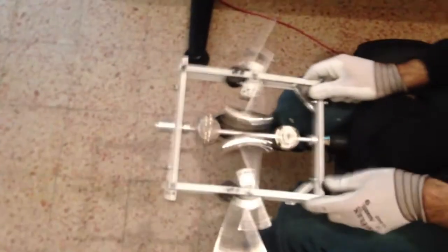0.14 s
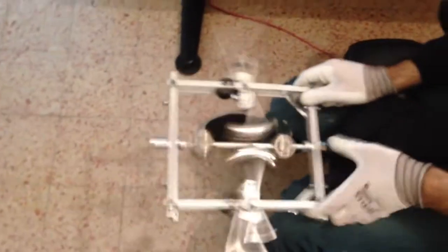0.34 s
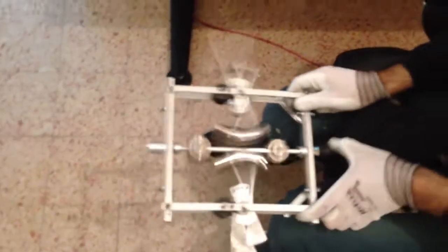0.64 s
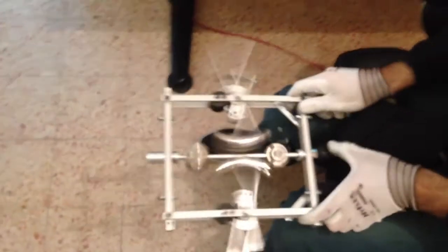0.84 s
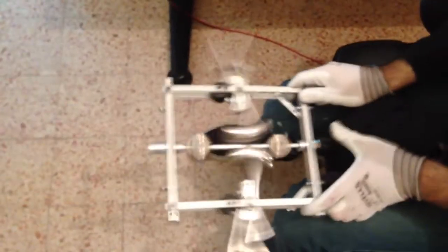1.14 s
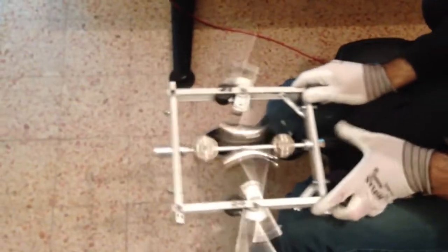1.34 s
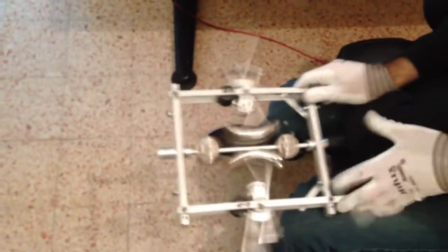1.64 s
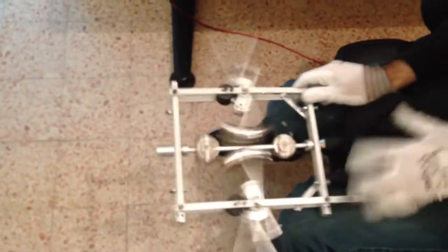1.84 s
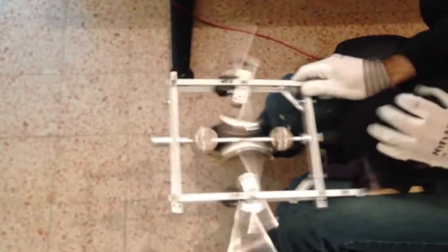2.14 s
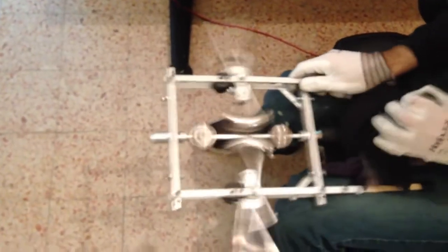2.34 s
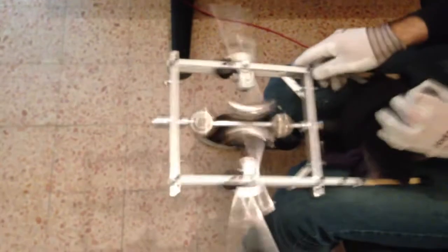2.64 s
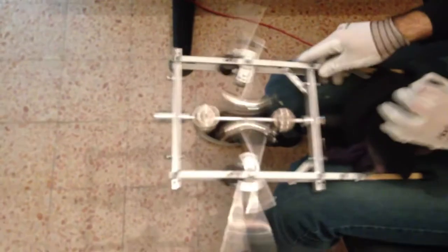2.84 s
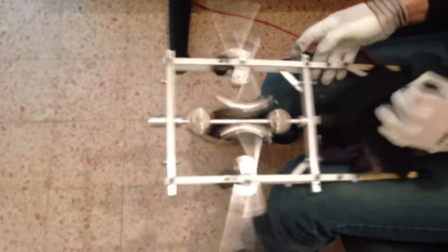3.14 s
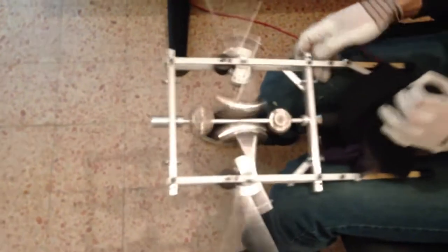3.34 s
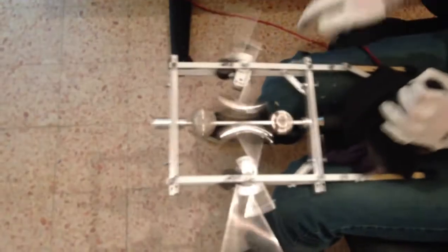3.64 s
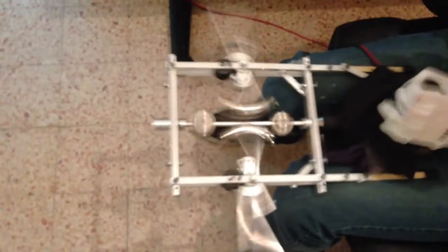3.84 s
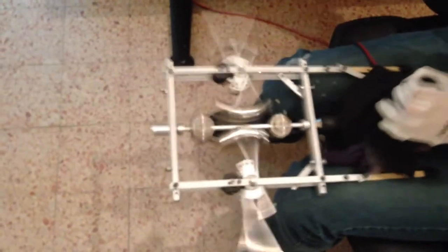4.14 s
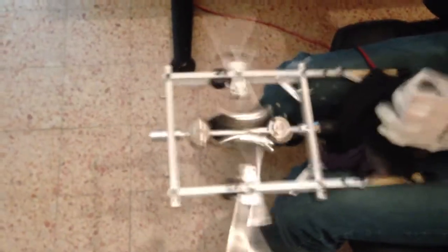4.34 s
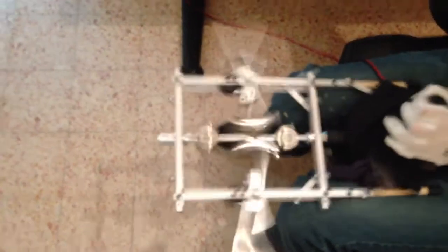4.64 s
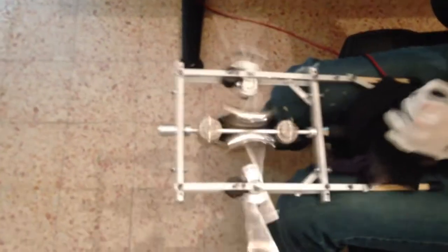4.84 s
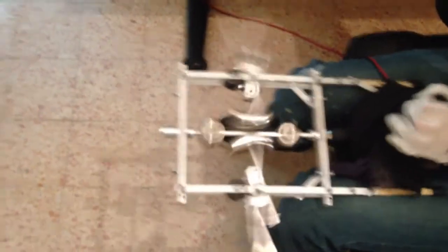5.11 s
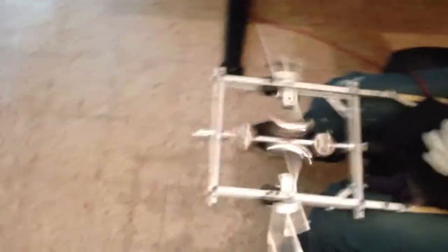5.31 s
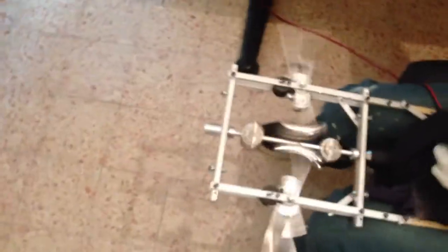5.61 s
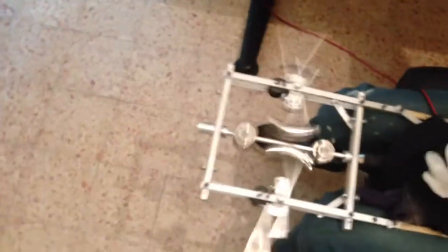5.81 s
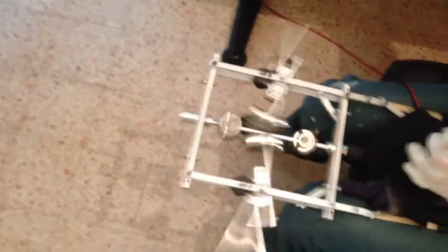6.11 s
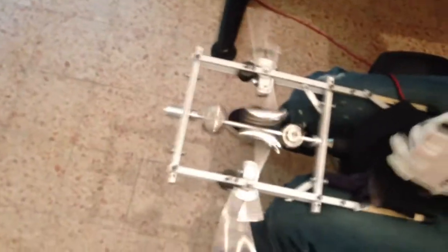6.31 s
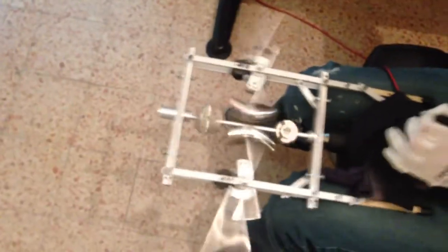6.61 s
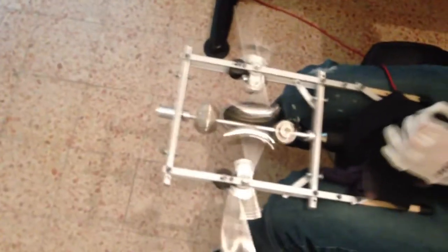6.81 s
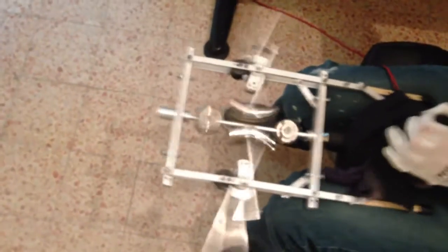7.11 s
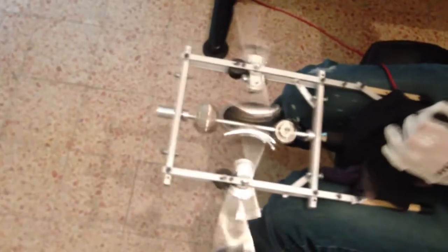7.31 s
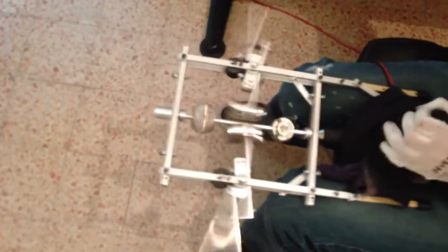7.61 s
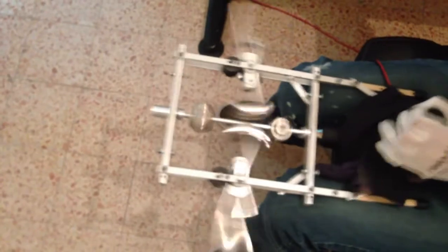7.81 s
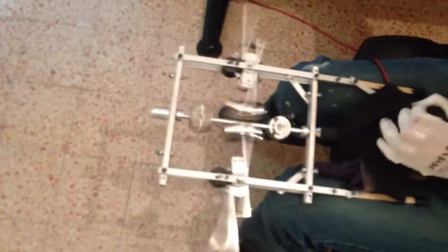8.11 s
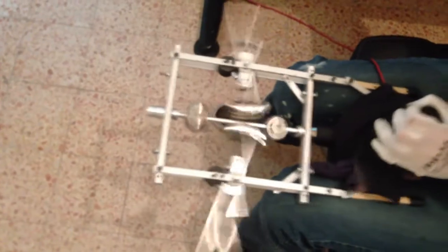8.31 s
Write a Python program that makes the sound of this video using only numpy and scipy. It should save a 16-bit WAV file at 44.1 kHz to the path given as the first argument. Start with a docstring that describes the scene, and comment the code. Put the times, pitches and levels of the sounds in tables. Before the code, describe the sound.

A motor-driven flapping mechanism clatters and whirs rapidly in a room, easing a little as its plastic wings start scraping the metal frame.

```python
"""A motor-driven pair of plastic wings flaps in a hand-held metal frame, in a hard-floored room.
At each turning point the loose linkage strikes, and the impacts excite the modes of its metal links.
Joints chatter, the film crinkles, and the gears whir, their pitch modulated by the load of each stroke.
One hand lets go and the frame shakes freely. The drive slows from about 15 to 12 beats a second,
and a wing then clashes with the frame on roughly every other beat."""
import sys
import numpy as np
from scipy import signal
from scipy.fft import rfft, irfft
from scipy.io import wavfile

SR = 44100
rng = np.random.default_rng(int(sys.argv[2]) if len(sys.argv) > 2 else 0)


def digitize_waveform(pressure):
    """Quantize a signal to 16-bit integers and store it at the path in sys.argv[1].

    Rows of a 2-D input are taken as channels; values are limited to [-1, 1].
    """
    field = np.atleast_2d(pressure).T
    bounded = np.clip(field, -1, 1)
    quanta = np.round(bounded * 32767).astype(np.int16)
    wavfile.write(sys.argv[1], SR, quanta)


N = 373086
TIME = np.arange(N) / SR

# speed of the crank: time_s, beat_rate_hz
CRANK_SPEED = [(0.0, 15.594), (0.97, 15.462), (1.37, 15.64), (2.1, 15.606), (2.67, 14.926), (2.81, 15.249),
               (3.55, 15.686), (4.05, 15.313), (4.67, 15.233), (5.03, 13.71), (5.57, 13.55), (6.2, 12.511),
               (6.6, 12.225), (7.63, 11.894), (8.46, 11.802)]
# how hard the whole frame rattles: time_s, gain_db
FRAME_SHAKING = [(0, 1), (.5, 0), (.85, -1.5), (1.3, -1), (2.1, .5), (3.9, 0), (4.25, 1), (4.38, 1),
                 (4.62, 2), (4.87, -0.5), (5.08, 0), (5.35, 0), (5.75, 0), (7.3, -1), (7.8, -5),
                 (8.18, 0.5), (8.46, -6.5)]
# spectra of the linkage's snap, knock and return and of the wing film: frequency_hz, gain_db
SNAP_SPECTRUM = [(100, -36), (600, -52), (1300, -27), (2600, 6.5), (4200, 6), (5200, 11.5), (6500, 7.5),
                 (9000, 6.5), (13500, 1.5), (15000, 0.5)]
KNOCK_SPECTRUM = [(100, -63), (650, 2), (1100, 1), (2300, 3), (3100, 4.5), (4200, 8.5), (5300, 9),
                  (7800, 6.5), (10000, -22), (14000, -24), (15000, -1)]
RETURN_SPECTRUM = [(100, -30), (600, -4), (1000, -8), (2400, 6), (3500, 0), (5100, 4), (5900, 0), (7000, 3),
                   (8500, -10), (13500, -16), (15000, -9)]
FILM_SPECTRUM = [(1000, -9), (3000, -29.5), (5000, 5), (7500, -8.5), (10000, -4.5), (13500, -11.5),
                 (15000, -9)]


def amp(db):
    """Decibels to amplitude ratio."""
    return 10 ** (np.asarray(db) / 20)


def unit_rms(x):
    """Normalisation to unit mean power."""
    return x / np.sqrt(np.mean(x ** 2) + 1e-20)


def curve(rows, time_s=TIME):
    """Linear interpolation in time of each column after the first."""
    times, *columns = np.transpose(rows)
    return [np.interp(time_s, times, column) for column in columns]


def at_frequency(points, hz):
    """Interpolation on a logarithmic frequency axis."""
    frequencies, values = np.transpose(points)
    return np.interp(np.log(hz + 1), np.log(frequencies + 1), values)


def add(mix, start_s, sound):
    """Superposition of a sound on the mix."""
    part = mix[max(round(start_s * SR), 0):][:len(sound)]
    part += sound[:len(part)]


def colour(x, spectrum, size=4096):
    """Minimum-phase filter of unit energy with the given spectrum."""
    log_gain = np.log(amp(at_frequency(spectrum, abs(np.fft.fftfreq(size, 1 / SR)))))
    response = np.fft.ifft(np.exp(signal.hilbert(log_gain).conj())).real[:size // 2]
    return signal.oaconvolve(x, response / np.linalg.norm(response))[:N]


def drift(rate_hz):
    """Slow random fluctuation: low-passed noise of unit rms."""
    rolloff = 1 + (np.fft.rfftfreq(N, 1 / SR) / rate_hz) ** 4
    return unit_rms(irfft(rfft(rng.standard_normal(N)) / rolloff, N))


def grains(per_s, spread_db):
    """Shot noise: sparse impulses of uneven size and random sign."""
    size = amp(spread_db * np.minimum(rng.exponential(1, N), 3))
    return unit_rms(size * rng.choice([-1, 1], N) * (rng.random(N) < per_s / SR))


def slowness(time_s=TIME):
    """Loss of crank speed: 0 at the fastest, 1 at the slowest."""
    rates = np.transpose(CRANK_SPEED)[1]
    return (rates.max() - curve(CRANK_SPEED, time_s)[0]) / np.ptp(rates)


def looseness(time_s=TIME, let_go_s=2.2, loosening_s=.49):
    """Freedom of the frame: 0 held in both hands, 1 once it shakes freely."""
    return np.clip((time_s - let_go_s) / loosening_s, 0, 1)


def room(x):
    """Reverberation: sparse reflections of random sign decay exponentially, each band at its own rate."""
    # reverberation time: frequency_hz, t60_s
    decay_times = [(150, 0.21), (600, 0.55), (2000, 0.45), (5000, 0.2), (10000, 0.32), (15000, 0.2)]
    build_up = 1 - np.exp(-TIME[:SR] / .004)
    reflections = rng.choice([-1., 1.], SR) * (rng.random(SR) < 4000 / SR) * build_up
    hz, t, bands = signal.stft(reflections, SR, nperseg=256)
    decay = amp(-60 * t / at_frequency(decay_times, hz)[:, None])
    tail = signal.istft(bands * decay, SR, nperseg=256)[1]
    return signal.fftconvolve(x, tail / np.linalg.norm(tail))[:N]


def shifting_room(x, rate_hz, count=4):
    """Directivity: moving parts radiate in changing directions, so sets of reflections take turns."""
    aim = np.array([drift(rate_hz) for _ in range(count)])
    return sum(room(x * share) for share in aim / np.linalg.norm(aim, axis=0))


def handling_thumps():
    """Structure-borne sound: moving the microphone gives soft, low tone pulses."""
    # thumps: start_s, pitch_hz, level_db, length_s
    thumps = [(5.12, 190, -38, .075), (5.205, 250, -40, .075)]
    out = np.zeros(N)
    for start_s, hz, db, length_s in thumps:
        t = np.arange(round(length_s * SR)) / SR
        envelope = np.sin(np.pi * t / length_s) ** 2
        add(out, start_s, amp(db) * np.sqrt(2) * np.sin(2 * np.pi * hz * t) * envelope)
    return out


def stirred_air(turns, peak_cycles=.38, depth_db=4):
    """Amplitude-modulated flow noise: the wings push the air twice a beat."""
    # spectrum of the moving air: frequency_hz, gain_db
    air_spectrum = [(20, -1), (50, 12), (85, -29), (110, -35), (150, 1.5), (200, 0.5), (260, 6), (360, 1),
                    (430, 5), (560, 7.5), (900, -2), (1500, -5), (4000, -61)]
    swell = unit_rms(amp(depth_db * np.cos(2 * np.pi * (2 * turns - peak_cycles))))
    return amp(-41.5) * unit_rms(colour(rng.standard_normal(N), air_spectrum)) * swell


def frame_drone(slow_change_db=4.5):
    """Resonance under random forcing: each low mode of the frame gives a narrow band of noise."""
    # modes of the frame: pitch_hz, width_hz, level_db
    frame_modes = [(206.8, 43, -56.5), (254.7, 30, -54.5), (313.2, 37, -57.5)]
    out = np.zeros(N)
    for hz, width_hz, db in frame_modes:
        envelope = drift(width_hz / 2) + 1j * drift(width_hz / 2)
        out += amp(db) * (np.exp(2j * np.pi * hz * TIME) * envelope).real
    return amp(slow_change_db * slowness()) * out


def rotor_hum(turns, rotor_turns_per_beat=8):
    """Periodic rotation: a wavering hum at the rotor's rate and at its second harmonic."""
    # strength of the hum: time_s, fundamental_db, octave_db
    hum_levels = [(0, -55, -57), (.5, -60, -56), (.75, -63, -49.5), (1.3, -67, -51), (1.55, -58, -66),
                  (2.8, -59, -60), (3.3, -77, -63), (4.2, -68, -50.5), (5.2, -73, -74)]
    angle = rotor_turns_per_beat * (2 * np.pi * turns + .025 * drift(rate_hz=3))
    fundamental_db, octave_db = curve(hum_levels)
    return np.sqrt(2) * (amp(fundamental_db) * np.sin(angle) + amp(octave_db) * np.sin(2 * angle))


def gear_tones(turns, slow_change_db=-2):
    """Line spectrum of the gear train: thin tones follow the crank, wavering as the frame moves."""
    # gear tones: multiple_of_beat_rate, level_db, loose_change_db
    lines = [(32, -51, -9), (33, -49.5, -5), (34.4, -57, 6), (40.1, -52, -3), (42.35, -47, -5),
             (44.3, -44.5, -4), (48.3, -46.5, -4)]
    tones = np.zeros(N)
    for multiple, db, loose_change_db in lines:
        gain = amp(db + loose_change_db * looseness() + 1.5 * drift(rate_hz=2))
        tones += gain * np.sin(2 * np.pi * multiple * turns + .6 * drift(rate_hz=5))
    return np.sqrt(2) * amp(slow_change_db * slowness()) * tones


def gear_whir(turns, load_peak_turns=.85):
    """Frequency modulation: the motor sags under each stroke, splitting the mesh tone into sidebands."""
    # partials of the tooth rate: harmonic_number, level_db
    harmonics = [(1, -40.5), (2, -52.5), (3, -53), (4, -46.5)]
    slow = slowness()
    mean_hz = 632 - 52 * slow
    load_angle = 2 * np.pi * (turns - load_peak_turns)
    load = np.cos(load_angle) + .1 * np.cos(3 * load_angle)
    waver = .012 * drift(rate_hz=25)
    sag = (.16 - .095 * slow) * load * (1 + .15 * drift(rate_hz=10))
    teeth = np.cumsum(mean_hz * (1 - sag + waver)) / SR
    whir = sum(amp(db) * np.sqrt(2) * np.sin(2 * np.pi * k * teeth) for k, db in harmonics)
    gain_db = -1.5 - 4.5 * slow - 4 * (1 - looseness()) - 2 * load  # quieter when slow, held or loaded
    roughness = 1 + .71 * drift(rate_hz=60)
    return amp(gain_db) * whir * roughness


def ring(x, modes):
    """Modal response: the excitation is convolved with a sum of damped sinusoids."""
    t = TIME[:SR // 8]
    response = sum(amp(db) * unit_rms(amp(-60 * t / t60_s) * np.sin(2 * np.pi * hz * t))
                   for hz, db, t60_s in modes)
    return signal.oaconvolve(x, response / np.sqrt(len(t)))[:N]


def links(x, detuning=.04, count=5):
    """Variable resonance: the metal links ring a little higher or lower as their joints shift."""
    # modes of the links: pitch_hz, level_db, t60_s
    link_modes = [(2220, -13, .018), (2420, -10, .022), (2560, -8, .028), (2720, -12, .02)]
    weights = np.array([drift(rate_hz=20) ** 3 for _ in range(count)])
    tunings = 1 + detuning * np.linspace(-1, 1, count)
    return sum(ring(x * share, [(hz * tuning, db, t60_s) for hz, db, t60_s in link_modes])
               for tuning, share in zip(tunings, weights / np.linalg.norm(weights, axis=0)))


def settling(turns, rise_turns, fall_db):
    """Envelope of damped motion: shaken up by snap and knock, dying away through the beat."""
    place = turns % 1
    floor = amp(-fall_db)
    shaken = floor + (1 - floor) * np.tanh((place / rise_turns) ** 2)
    return unit_rms(shaken * amp(-fall_db * place ** 2))


def rattle(turns):
    """Filtered shot noise: joints chatter and the film crinkles, most just after the wing turns over."""
    # spectra of the joints' chatter and of the quickly dying buzz: frequency_hz, gain_db
    joint_spectrum = [(150, -44), (400, 1.5), (900, -1), (1230, -3), (1450, 3.5), (1750, 5), (2100, -0.5),
                      (2500, 3.5), (3000, 2), (3700, 5.5), (4550, 3), (5200, 2), (7000, -1.5),
                      (11000, -15.5)]
    buzz_spectrum = [(1500, -33.5), (2000, 3), (2450, 0.5), (2900, -10), (3400, -15.5), (4000, -3.5),
                     (4700, -21), (8000, -3.5), (12000, -25.5)]
    # strength of buzz and clinks together: time_s, gain_db
    upper_levels = [(0, -34), (.6, -34.5), (2.1, -32.5), (4.1, -36.5), (5.1, -42), (6.3, -38.5), (6.9, -36),
                    (8.46, -40)]
    joints = amp(-30.5) * colour(grains(per_s=2500, spread_db=2.5), joint_spectrum)
    joints *= settling(turns, rise_turns=.094, fall_db=8.5)
    clinks = amp(-6.5) * links(grains(per_s=250, spread_db=2))
    buzz = amp(-3.5) * colour(grains(per_s=900, spread_db=1.5), buzz_spectrum)
    upper = amp(curve(upper_levels)[0]) * (buzz + clinks) * settling(turns, rise_turns=.14, fall_db=36)
    film = amp(-36.5 - 8.5 * np.sqrt(slowness())) * colour(grains(per_s=1000, spread_db=2), FILM_SPECTRUM)
    film *= settling(turns, rise_turns=.1, fall_db=16)
    return amp(curve(FRAME_SHAKING)[0]) * (joints + upper + film)


def strike(contacts, spectrum, scuff_s):
    """Impact excitation: each hard contact is a very short, filtered burst of noise."""
    t, out = TIME[:SR // 100], np.zeros(N)
    for start_s, db in contacts:
        hit = colour(rng.choice([-1, 1], len(t)) * np.exp(-t / scuff_s), spectrum)
        add(out, start_s, amp(db) * hit / np.linalg.norm(hit))
    return out


def pings(tick_db=-3):
    """Free vibration: a loose pin or link, struck once, ticks and rings in a single mode."""
    # struck pins and links, mostly just after the hand lets go: start_s, pitch_hz, level_db, t60_s
    pins = [(1.719, 4080, -9, .04), (2.417, 3440, -2, .035), (2.482, 3500, -3, .035),
            (2.548, 3520, -2, .03), (2.615, 3450, 0, 0.036), (2.748, 3440, -5, .03), (2.879, 3500, -8, .03),
            (2.944, 3420, -1, 0.02), (3.008, 3440, -5, .03), (3.016, 5500, -4, .04),
            (3.14, 3490, -5, 0.038), (3.173, 2400, -7, 0.032), (3.269, 3405, -6, .025),
            (3.398, 3440, -5, 0.016), (3.494, 4110, -1, 0.064), (3.797, 2550, -2, 0.037),
            (3.948, 3690, -5, 0.048), (4.01, 2560, -3, .035)]
    t, out = TIME[:SR // 8], np.zeros(N)
    for start_s, hz, db, t60_s in pins:
        tone = amp(-60 * t / t60_s) * np.sin(2 * np.pi * hz * t)
        add(out, start_s, amp(db) * tone / np.linalg.norm(tone))
    ticks = [(start_s, db + tick_db) for start_s, _, db, _ in pins]
    return out + strike(ticks, RETURN_SPECTRUM, scuff_s=.00039)


def hard_contacts():
    """Isolated transients: single impacts stand out of the rattle."""
    # unusually hard snaps and knocks, and clacks of a wing's edge on the frame: start_s, level_db
    snaps = [(.5525, -1), (2.6815, -1), (3.3325, -2), (3.718, -6), (3.783, -13), (3.847, -5), (3.9107, 0.5),
             (4.1085, -3), (4.369, -0.5), (4.434, -1)]
    knocks = [(.5598, -6), (.625, 3.5), (.6893, -2), (.8192, -2), (2.581, -1), (2.6485, -1), (2.7152, -4),
              (2.8483, -13), (3.173, -4), (3.2388, -1), (3.4943, -5), (3.5585, -2), (4.4657, 0),
              (4.5978, 2), (4.7085, 1), (4.7967, 1), (4.8425, 0), (4.866, -10), (4.9354, 2)]
    clacks = [(5.341, -16), (5.7447, -6), (6.0268, -0.5), (6.9885, -2), (7.001, -1), (7.153, -2),
              (7.157, 2.5), (7.324, 3), (7.49, 5), (7.4955, -6), (8.004, -1), (8.163, 5), (8.177, 5),
              (8.266, -5)]
    # spectrum of a clack: frequency_hz, gain_db
    clack_spectrum = [(100, -38), (1000, -6), (2800, -19), (3800, 9.5), (5500, 3), (6800, 0), (9000, -5),
                      (11000, -13), (15000, -17)]
    return (strike(snaps, SNAP_SPECTRUM, scuff_s=.0014)
            + strike(knocks, KNOCK_SPECTRUM, scuff_s=.00083)
            + strike(clacks, clack_spectrum, scuff_s=.00088))


def wing_clashes(crack_s=.0075, lead_s=.003, shudder_db=-12, shudder_lengths=2.2):
    """Friction as many small impacts: the film cracks, then the wing scrapes the frame and shudders."""
    # a wing meets the frame: start_s, level_db, length_s, rise_s, crack_db
    clashes = [(4.827, -25, 0.031, .001, -33), (4.9, -20, .008, .001, -28), (5.338, -21, 0.007, .001, -35),
               (5.709, -21.5, .017, 0.0012, -28), (5.934, -23.5, 0.01, 0.0011, -31),
               (6.015, -22.5, 0.0072, 0.0012, -33), (6.824, -21.5, 0.0063, .001, -20.5),
               (6.983, -24, .042, 0.0013, -29), (7.153, -19.5, 0.013, 0.00071, -21),
               (7.315, -23.5, 0.017, 0.0022, -25), (7.485, -20.5, 0.025, .001, -20),
               (7.57, -30, 0.039, .002, -29), (7.654, -25.5, 0.012, 0.0022, -27),
               (7.759, -28, .009, 0.0012, -41), (7.822, -24, 0.018, .001, -22),
               (7.983, -22.5, 0.037, 0.012, -25), (8.161, -22.5, 0.019, .004, -17.5),
               (8.33, -19, .01, 0.0025, -24), (8.437, -22.5, .006, 0.0012, -37)]
    # spectrum of the scrape: frequency_hz, gain_db
    scrape_spectrum = [(100, -60), (500, -7.5), (1100, -6.5), (1750, 3), (2400, -0.5), (3000, -5.5),
                       (3600, 4.5), (4150, 6), (4550, -10), (5200, 1.5), (6000, -4.5), (7000, 0),
                       (9000, -10.5), (13000, -20), (15000, -12)]
    force, crack, t = np.zeros(N), np.zeros(N), TIME[:SR // 2]
    for start_s, db, length_s, rise_s, crack_db in clashes:
        contact = np.exp(-(t / length_s) ** 2)
        shudder = amp(shudder_db) * np.exp(-(t / (shudder_lengths * length_s)) ** 2)
        add(force, start_s, amp(db) * (contact + shudder) * (1 - np.exp(-t / rise_s)))
        add(crack, start_s - lead_s, amp(crack_db) * np.exp(-t / crack_s))
    scrapes = colour(grains(per_s=3500, spread_db=1.5) * force, scrape_spectrum)
    return scrapes + colour(grains(per_s=3800, spread_db=6.5), FILM_SPECTRUM) * crack


def blow(turns, spectrum, place_turns, level_db, loose_change_db, slow_change_db, scuff_s):
    """Quasi-periodic impacts: one short noise burst a beat, its force set by speed, grip and shaking."""
    scatter_db, jitter_s = 1.77, .0005
    starts = TIME[1:][np.diff(np.floor(turns - place_turns)) > 0]
    softening = slowness(starts) ** 1.9  # the force holds until the drive is well below full speed
    levels = level_db + loose_change_db * looseness(starts) + slow_change_db * softening
    t, out = TIME[:600], np.zeros(N)
    for start_s, db in zip(starts, levels + curve(FRAME_SHAKING, starts)[0]):
        harder, later = rng.standard_normal(2)
        scuff = rng.standard_normal(len(t)) * np.exp(-t / scuff_s)
        scuff *= np.sqrt(.002 * SR) / np.linalg.norm(scuff)  # equal energy for any length
        add(out, start_s + jitter_s * later, amp(db + scatter_db * harder) * scuff)
    return colour(out, spectrum)


def wing_linkage(turns):
    """Backlash: the wing snaps over, knocks on its stop, returns and rebounds; the blows ring the links."""
    # catch, snap, knock, return, rebound: place_turns, level_db, loose_change_db, slow_change_db, scuff_s
    beat_blows = [(-.03, -28, -2.5, -10, 0.0014), (.012, -23, 0, -6, 0.0022), (.165, -22, -3.5, -2, 0.0018),
                  (0.501, -32, 7, -3, 0.00078), (.61, -35, 7.5, 4, 0.0018)]
    # spectrum of the rebound: frequency_hz, gain_db
    rebound_spectrum = [(100, -15), (700, -12), (1100, -32), (2300, -13), (3000, 9), (3700, 16), (4800, 10),
                        (5800, -15), (7500, 1), (15000, -23)]
    spectra = (SNAP_SPECTRUM, SNAP_SPECTRUM, KNOCK_SPECTRUM, RETURN_SPECTRUM, rebound_spectrum)
    blows = sum(blow(turns, spectrum, *row) for spectrum, row in zip(spectra, beat_blows))
    knock_count = np.floor(turns - beat_blows[2][0])
    taps = np.diff(knock_count, prepend=knock_count[0]) * amp(-1 - 3 * looseness() - 8 * slowness())
    return blows + links(taps + amp(-12) * blows)


def scene(phase_lag_turns=.567):
    """Direct and reverberant sound add; one turn of the crank is one wing beat."""
    turns = np.cumsum(curve(CRANK_SPEED)[0]) / SR - phase_lag_turns
    knocks, chatter, whir = wing_linkage(turns), rattle(turns), gear_whir(turns)
    clashes = wing_clashes()
    accents = hard_contacts() + pings()
    direct = knocks + amp(-1.5) * chatter + amp(-3) * whir + clashes + accents
    echo = shifting_room(amp(-.5) * knocks + amp(-3) * chatter + amp(-3.5) * clashes, rate_hz=55)
    echo += shifting_room(amp(-3) * whir + amp(-6) * accents, rate_hz=5)
    hum = gear_tones(turns) + rotor_hum(turns) + frame_drone()
    return (direct + echo + hum + stirred_air(turns) + handling_thumps())[None]


def record(dry, low_hz=120, high_hz=15350):
    """Band limiting: the small microphone loses the bass, and a steep low-pass cuts the top treble."""
    high_pass = signal.butter(4, low_hz, btype="high", fs=SR, output="sos")
    low_pass = signal.firwin(801, high_hz, window=("kaiser", 9), fs=SR)
    return signal.oaconvolve(signal.sosfilt(high_pass, dry), low_pass[None], "same")


dry = scene()
out = record(dry)
digitize_waveform(out)
```